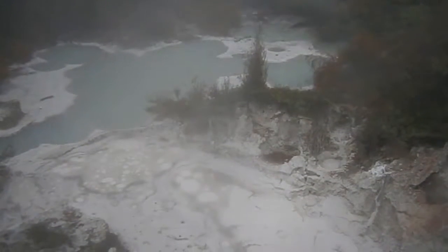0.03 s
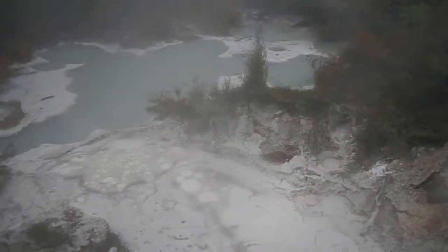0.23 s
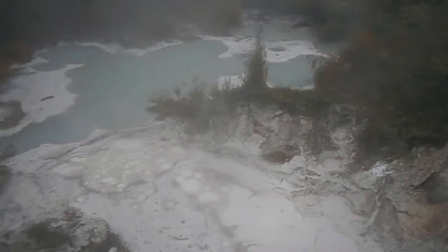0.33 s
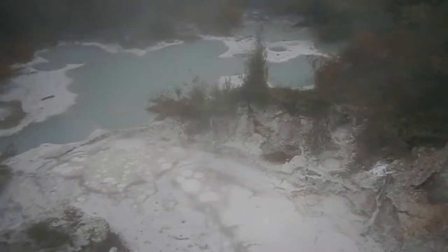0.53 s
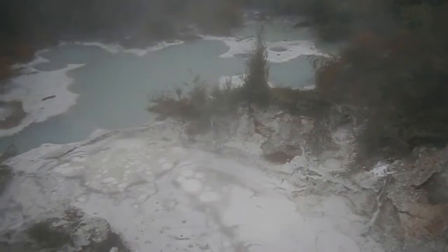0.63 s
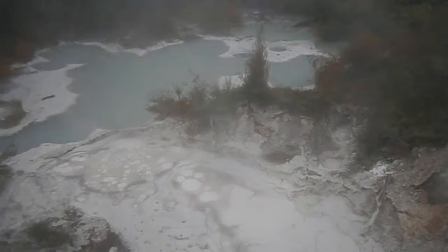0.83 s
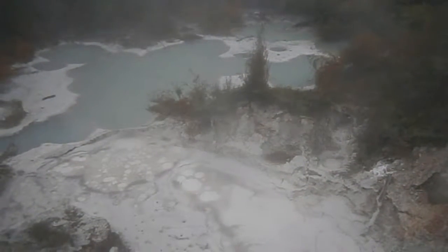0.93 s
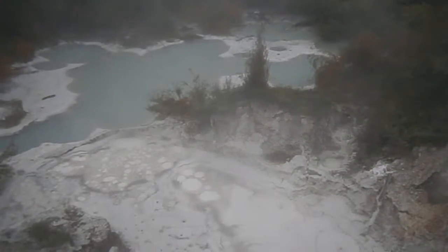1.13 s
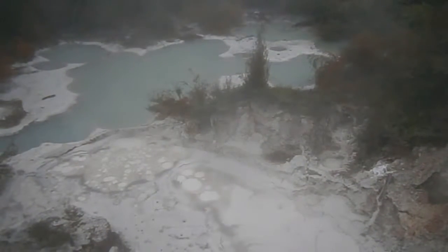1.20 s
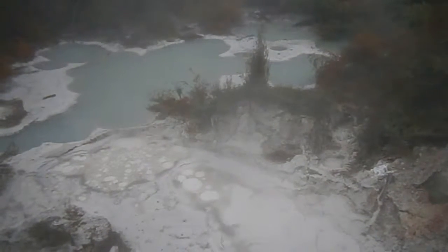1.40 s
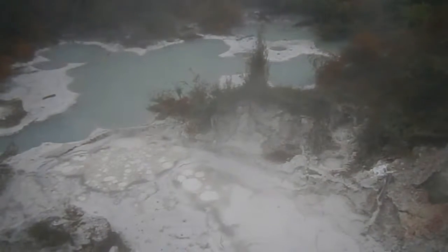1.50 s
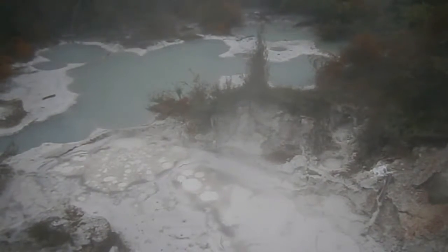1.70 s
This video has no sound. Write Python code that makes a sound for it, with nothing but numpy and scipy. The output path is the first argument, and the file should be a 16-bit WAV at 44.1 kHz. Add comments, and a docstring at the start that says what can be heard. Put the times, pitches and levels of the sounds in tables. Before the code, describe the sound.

A hot mud pool bubbling with irregular low plops over a faint steam hiss.

```python
"""At a hot mud pool outdoors, big gas bubbles open with a low plop. The film of each one snaps, the
impulse excites the resonances of the vent's hollow, and mud spatters. Small bubbles blip as damped
oscillators, droplets tick and gas sizzles through thin mud; the rocky banks scatter a short echo.
Behind them lie a dense simmer, the low churning of the far pool and a steady hiss of steam."""
import sys
import numpy as np
from scipy import signal
from scipy.fft import rfft, irfft
from scipy.io import wavfile
from scipy.ndimage import uniform_filter1d

SR = 44100
rng = np.random.default_rng(int(sys.argv[2]) if len(sys.argv) > 2 else 0)


def to_wav(sig):
    """Store sig (one row per channel, or 1-D mono) as 16-bit WAV at the path in sys.argv[1].

    Samples outside -1..1 are clipped; the rate is SR.
    """
    pcm = np.clip(np.atleast_2d(sig), -1, 1) * 32767
    pcm = np.round(pcm).astype(np.int16)
    wavfile.write(sys.argv[1], SR, pcm.T)  # frames by channels


N = 77175

# Big bubbles: t/s, f/Hz, level/dB, ring time/s, snap gain/dB, snap cutoff/Hz,
# spatter level/dB, spatter decay time/s
BIG_BUBBLES = [(0.1665, 163.5, -7, 0.0083, -10.5, 740, -55.5, 0.036),
               (.193, 135, -28.5, 0.012, -42, 910, -45.5, 0.026),
               (0.2474, 199, -30.5, 0.015, -30, 800, -51, 0.0067),
               (0.3542, 264.5, -20.5, .012, -27.5, 2220, -38, 0.019),
               (0.7809, 204, -23, .011, -35, 3020, -43.5, 0.017),
               (.8095, 270, -24.5, .011, -18.5, 1070, -55, 0.027),
               (0.8083, 140, -28, 0.0059, -46, 800, -62, .02),
               (0.9713, 240, -39.5, 0.014, -44, 890, -65, .017),
               (1.1732, 294, -35, 0.0062, -36, 600, -44, 0.02),
               (1.251, 310, -38, .010, -42, 2000, -54, 0.06),
               (1.3274, 175, -34, 0.017, -27, 2020, -36, 0.015),
               (1.3323, 288, -30, 0.014, -24, 2020, -51, .015),
               (1.656, 220, -39.5, .014, -54, 800, -69, 0.015)]
PLOP_RISE_PER_S, BLIP_RISE_PER_S = 9.8, 10.4  # pitch glide relative to the starting frequency


def plops():
    """Cavity resonance: each big bubble sounds a low note, with the deepest bass filtered out."""
    notes = bubbles([row[:4] for row in BIG_BUBBLES], PLOP_RISE_PER_S)
    low_cut = signal.butter(1, 64, "high", fs=SR, output="sos")
    return signal.sosfilt(low_cut, notes)


def snaps():
    """Impulse excitation: the tearing film rings the modes of the vent; thick mud dulls the sound."""
    # Modes of the vent's hollow: f/Hz, relative level/dB, T60/s
    vent_modes = [(317.7, -7, 0.07), (527.5, -13.5, 0.077), (691, -6.5, 0.041), (838, -10.5, 0.055),
                  (978, -16.5, .05), (1073, -7, 0.079), (1140, -15, 0.11), (1330, -11.5, .06),
                  (1383, -12.5, 0.071), (1820, -8.5, 0.08), (1930, -7, 0.061), (2020, -18, 0.083),
                  (3120, -19, .09), (3760, -36, 0.063)]
    pulse_s, lead_s = 0.00026, 0.0007
    t, out = np.arange(SR // 5) / SR, np.zeros(N)
    ring = sum(undb(db) * np.cos(2 * np.pi * hz * t) * np.exp(-np.log(1000) * t / t60)
               for hz, db, t60 in vent_modes)
    pulse = (1 - t / pulse_s) * np.exp(-t / pulse_s)
    snap = ring / 2 + undb(-2.5) * pulse
    for start, _, _, _, db, cutoff_hz, _, _ in BIG_BUBBLES:
        dull = signal.butter(4, cutoff_hz, fs=SR, output="sos")
        add(out, start - lead_s, undb(db) * signal.sosfilt(dull, snap))
    return out


def spatter():
    """Shot noise: shreds of each film fall back as a quickly fading spray of tiny clicks."""
    # Spectrum of the spray: f/Hz, relative level/dB
    spectrum = [(400, -15), (1200, 4.5), (2000, -5), (2500, -6.5), (4000, -6), (5500, -20), (8000, -15.5),
                (13000, -34)]
    rise_s = 0.001
    t, env = np.arange(N) / SR, np.zeros(N)
    for start, *_, db, decay_s in BIG_BUBBLES:
        add(env, start, undb(db) * (1 - np.exp(-t / rise_s)) * np.exp(-t / decay_s))
    return env * crackle(spectrum, per_s=2500)


def blips():
    """Bubble resonance: smaller gas pockets ring higher, each gliding upward as it opens."""
    # Small bubbles: t/s, f/Hz, level/dB, ring time/s
    small_bubbles = [(.021, 900, -40, 0.0026), (.034, 900, -32.5, 0.0034), (.124, 1080, -38, 0.0038),
                     (.141, 806, -36, 0.0043), (.2005, 1134, -33, 0.0037), (.336, 1110, -38, 0.002),
                     (.3528, 1202, -31.5, .006), (.3545, 1840, -30.5, 0.0041), (.369, 1865, -33.5, 0.0079),
                     (.4012, 2010, -35.5, 0.0031), (.4012, 1280, -34, 0.0028), (.416, 830, -34, 0.0077),
                     (.486, 810, -43.5, 0.0082), (.5215, 1180, -38.5, 0.0043), (.5225, 564, -42, 0.011),
                     (.538, 1480, -45, 0.0047), (.5832, 717, -37, 0.0085), (.7248, 690, -32, 0.0033),
                     (.7252, 1130, -30.5, 0.0026), (.799, 1470, -48, 0.0034), (.8195, 1028, -30, 0.0065),
                     (.8228, 1760, -43, 0.013), (.838, 1010, -39, 0.0044), (.927, 1220, -42, 0.0059),
                     (.9732, 810, -34, 0.0063), (1.042, 1460, -49, 0.0036), (1.172, 530, -33, 0.0048),
                     (1.275, 540, -37.5, 0.0069), (1.31, 905, -38.5, 0.013), (1.417, 993, -41.5, 0.0075),
                     (1.434, 1090, -44, 0.0054), (1.5128, 1150, -25, 0.0012), (1.627, 1480, -41.5, 0.0024),
                     (1.6618, 750, -32.5, 0.0045), (1.691, 1350, -45, 0.0032)]
    return bubbles(small_bubbles, BLIP_RISE_PER_S)


def ticks():
    """Impact transients: droplets of mud land with heavily damped notes of constant pitch."""
    # Landing droplets: t/s, f/Hz, level/dB, ring time/s
    droplets = [(.0215, 3880, -44, 0.00076), (.1833, 8500, -26, 0.00033), (.2212, 9100, -32.5, 0.00046),
                (.2299, 4230, -37, 0.0019), (.3565, 4150, -42.5, 0.0025), (.358, 7500, -40.5, .002),
                (.414, 3850, -50, 0.0011), (.7808, 3420, -28, 0.00049), (.7865, 3400, -38, 0.0011),
                (1.266, 2780, -37, 0.0016), (1.513, 3250, -35.5, 0.0007), (1.5332, 8850, -20, 0.00031),
                (1.5333, 3700, -27, 0.00073), (1.693, 4500, -37, .0004)]
    return bubbles(droplets, rise_per_s=0)


def sizzles():
    """Shot noise in bursts: gas escapes through thin mud in short runs of pinhead bubbles."""
    # Escapes of gas: t/s, level/dB, decay time/s
    bursts = [(0.026, -49, 0.024), (0.073, -51, 0.014), (0.204, -59, 0.0045), (0.213, -50, .025),
              (0.322, -64, .004), (0.404, -48, 0.021), (0.517, -53, 0.027), (0.835, -51.5, .018),
              (1.1904, -39.5, .005), (1.219, -49, 0.023), (1.247, -50, 0.035), (1.323, -44, 0.037),
              (1.41, -49, .006), (1.435, -48.5, 0.029), (1.688, -44.5, 0.008)]
    # Spectrum of the pinhead bubbles: f/Hz, relative level/dB
    spectrum = [(700, -16), (1400, 7.5), (2200, -10.5), (2800, 3.5), (4200, 6.5), (5300, -14.5), (9000, 0),
                (13000, -19)]
    rise_s = 0.00065
    t, env = np.arange(N) / SR, np.zeros(N)
    for start, db, decay_s in bursts:
        add(env, start, undb(db) * (1 - np.exp(-t / rise_s)) * np.exp(-(t / decay_s) ** 2))
    return env * crackle(spectrum, per_s=2500)


def bank_echo(direct):
    """Diffuse reflection: the rocky banks add a short, mostly midrange echo to the direct sound."""
    echo_db, t60_s, delay_s = -11, 0.15, 0.009
    t = np.arange(SR // 2) / SR
    tail = rng.standard_normal(len(t)) * np.exp(-np.log(1000) * t / t60_s) * (t > delay_s)
    midrange = signal.butter(1, [440, 2620], "band", fs=SR, output="sos")
    response = signal.sosfilt(midrange, tail / np.linalg.norm(tail))
    return direct + undb(echo_db) * signal.fftconvolve(direct, response)[:N]


def swarm(count, low_hz, high_hz, cycles, spread_db):
    """Incoherent addition: many faint bubbles of random size and timing merge into one texture."""
    when, pitch, strength, sustain = rng.random((count, 4)).T
    hz = low_hz * (high_hz / low_hz) ** pitch
    ring_s = cycles * (0.5 + sustain) / hz
    return bubbles(zip(when * N / SR, hz, spread_db * strength, ring_s), BLIP_RISE_PER_S)


def churn():
    """Amplitude-modulated noise: the churning of the far pool blurs into a wavering rumble."""
    # Spectrum of the far pool: f/Hz, relative level/dB
    spectrum = [(20, -14), (45, -9), (80, -4), (170, 1), (300, -1.5), (450, -7), (850, -6.5), (1400, -14.5),
                (2400, -22), (5000, -41.5)]
    return colour(rng.standard_normal(N), spectrum) * waver(per_s=25.07, depth_db=1.0)


def steam():
    """Broadband flow noise: escaping steam hisses at a nearly constant level."""
    # Spectrum of the steam: f/Hz, relative level/dB
    spectrum = [(800, -24), (2300, -1.5), (3800, 2.5), (5400, -3.5), (6500, -2.5), (8000, -1.5),
                (9600, 1.5), (11000, -3.5), (13000, -7)]
    return colour(rng.standard_normal(N), spectrum) * waver(per_s=9, depth_db=0.11)


def bubbles(rows, rise_per_s):
    """Damped oscillation: each row (t/s, f/Hz, level/dB, ring time/s) swells, glides and dies away."""
    attack_cycles, fade_power = 0.34, 2.17
    out = np.zeros(N)
    for start, hz, db, ring_s in rows:
        t = np.arange(int(4 * ring_s * SR) + 2) / SR
        env = (1 - np.exp(-t * hz / attack_cycles)) * np.exp(-(t / ring_s) ** fade_power)
        phase = 2 * np.pi * hz * t * (1 + rise_per_s * t / 2)
        add(out, start, -undb(db) * env * np.sin(phase))
    return out


def crackle(spectrum, per_s):
    """Poisson process: independent tiny clicks, filtered and scaled to rms 1."""
    clicks = rng.standard_normal(N) * (rng.random(N) < per_s / SR)
    return level(colour(clicks, spectrum), 0)


def waver(per_s, depth_db):
    """Random modulation: a gain that drifts about 1 with a standard deviation of depth_db."""
    hold = int(SR / per_s)
    steps = np.repeat(rng.standard_normal(N // hold + 1), hold)
    drift = uniform_filter1d(steps, hold)[:N]
    return undb(depth_db * drift / drift.std())


def colour(x, spectrum):
    """Spectral shaping: filter by points (f/Hz, level/dB) joined on a logarithmic frequency axis."""
    hz, db = np.array(spectrum).T
    f = np.maximum(np.arange(N // 2 + 1) * SR / N, 1)
    gain = undb(np.interp(np.log(f), np.log(hz), db))
    return irfft(rfft(x, N) * gain, N)


def undb(db):
    """Amplitude ratio of a level in decibels."""
    return 10 ** (np.asarray(db) / 20)


def level(x, db):
    """Normalisation to an rms level in decibels."""
    return x * undb(db) / np.sqrt(np.mean(x ** 2))


def add(out, start_s, x):
    """Superposition of x on out from a given time."""
    i = max(int(start_s * SR), 0)
    out[i:i + len(x)] += x[:max(len(out) - i, 0)]


def scene():
    """Superposition: near bubbles and their echo sound over the simmering pool and the steam."""
    # How hard the pool simmers: t/s, relative level/dB
    activity_curve = [(0, 0.5), (.13, 1.5), (.3, 0), (.55, -0.5), (.74, 1), (.9, -1), (1.05, -0.5),
                      (1.3, 1), (1.42, 0), (1.55, 0), (1.75, 0)]
    times, gains_db = np.array(activity_curve).T
    activity = undb(np.interp(np.arange(N) / SR, times, gains_db))
    far, hiss = level(churn(), -48), level(steam(), -54)
    near = bank_echo(plops() + snaps() + spatter() + sizzles() + blips() + ticks())
    simmer = level(swarm(count=420, low_hz=254.5, high_hz=1442, cycles=3.6, spread_db=11.5), -53)
    fizz = level(swarm(count=420, low_hz=1610, high_hz=10500, cycles=2.8, spread_db=19.5), -62)
    return (near + activity * (far + simmer + fizz) + hiss)[None]


def record(dry):
    """Band limiting: a steep elliptic low-pass removes the highest treble."""
    top_hz = 12500
    return signal.sosfilt(signal.ellip(10, 0.2, 70, top_hz, fs=SR, output="sos"), dry)


dry = scene()
out = record(dry)
to_wav(out)
```